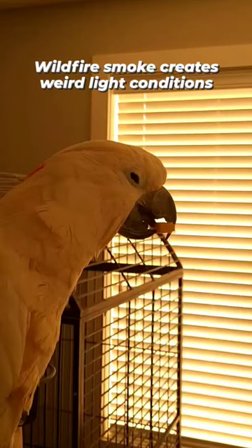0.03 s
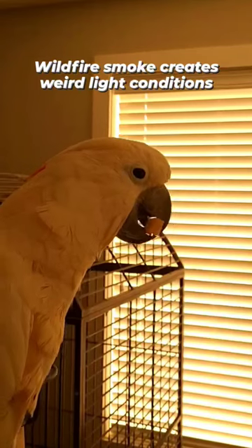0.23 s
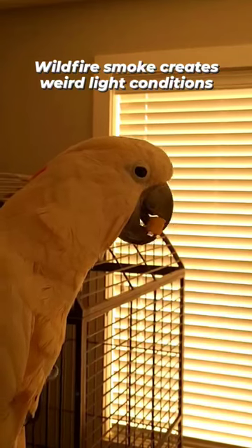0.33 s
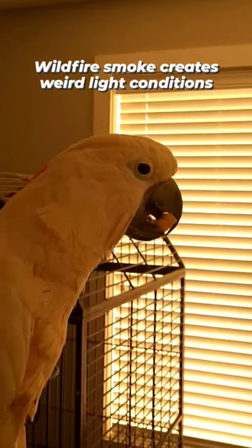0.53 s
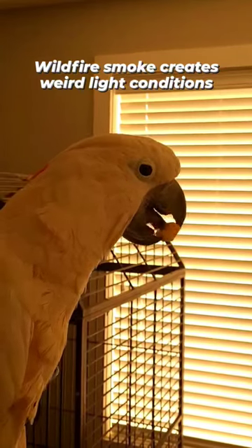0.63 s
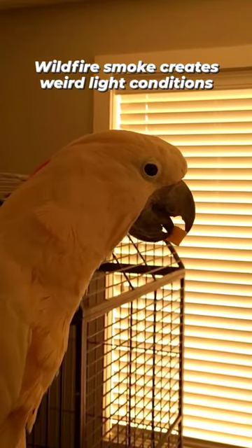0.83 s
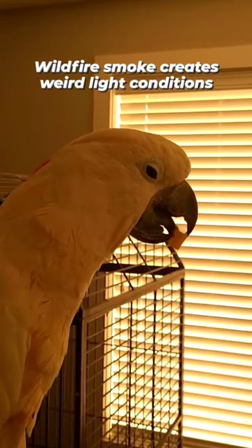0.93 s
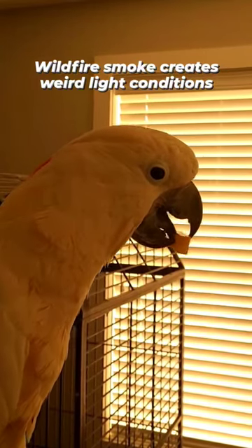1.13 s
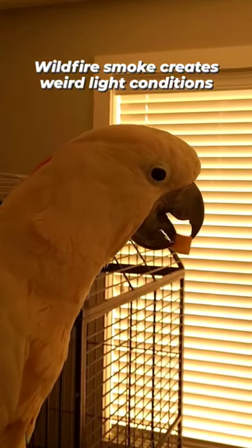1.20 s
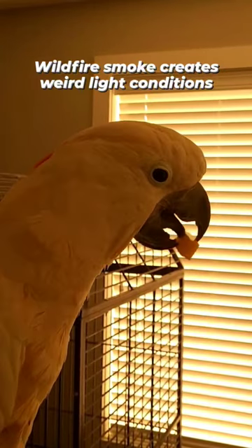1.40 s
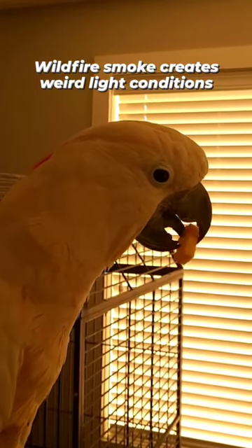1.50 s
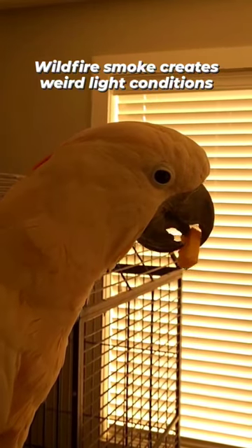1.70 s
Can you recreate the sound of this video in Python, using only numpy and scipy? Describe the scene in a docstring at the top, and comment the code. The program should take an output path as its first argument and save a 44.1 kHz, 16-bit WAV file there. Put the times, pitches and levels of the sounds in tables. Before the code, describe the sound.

A parrot nibbles hard food close to the microphone, its beak making sharp, irregular clicks and small cracks with a brief scrape early on. The quiet, bare room echoes lightly, and an appliance hums faintly behind.

```python
"""In a quiet, bare room, a parrot close by bites at a piece of hard food.
Each bite is a burst of tiny breaks that makes the beak ring; now and then the beak slips and scrapes.
The bird and its cage scatter these sounds, and the walls echo them.
Behind it all, an appliance hums unevenly over faint room noise."""
import sys
import numpy as np
from scipy import signal
from scipy.fft import rfft, irfft
from scipy.io import wavfile
from scipy.ndimage import uniform_filter1d

SR = 44100
rng = np.random.default_rng(int(sys.argv[2]) if len(sys.argv) > 2 else 0)


def generate_wav(sig):
    """Save sig (samples, or channels by samples) to the path in sys.argv[1] as 16-bit PCM at SR."""
    pcm = np.round(np.clip(np.atleast_2d(sig).T, -1, 1) * 32767).astype(np.int16)
    wavfile.write(sys.argv[1], SR, pcm)


N = 77175

# Tone of the broad room noise: f/Hz, relative level/dB
NOISE_SHAPE = [(25, -11), (60, 1.5), (160, 4), (300, 3), (450, 1), (650, -9), (1000, -4), (1450, -7.5),
               (2200, -18), (3000, -37), (4000, -22.5), (6000, -32.5), (15000, -29)]
# Low drones in the room noise: f/Hz, width/Hz, level/dB
LOW_DRONES = [(71.4, 10, -74.5), (92.6, 7.7, -81), (223.7, 16, -68.5), (301.7, 17, -76), (420, 45, -72.5)]
# How the hum swells and fades, before HUM_BOOST_DB is added: t/s, level/dB
HUM_SWELLS = [(0.56, -67.5), (0.612, -63.5), (0.646, -69), (0.742, -75), (0.764, -80.5), (0.888, -61),
              (0.986, -81), (1.026, -59.5), (1.056, -85), (1.126, -59), (1.166, -82.5), (1.208, -55),
              (1.266, -54), (1.292, -77.5), (1.372, -54.5), (1.408, -66.5), (1.632, -57.5), (1.75, -67.5)]
# One bite a row: t/s, level/dB, ring f/Hz; then, compared with the ring: head/dB, thud/dB, knock/dB,
# tick/dB, glint/dB, crack/dB; last: extra crack treble/dB, crumble time/ms, echo level/dB
BEAK_BITES = [ (0.1148, -32.5, 3240, -16, -10, 6, -10, -12, -1.5, -6, 4.3, 2),
              (0.1494, -8, 3704, 8, 1.5, -0.5, 5.5, -22, -15, -15, 3.6, -6),
              (0.1521, 5, 4060, -1, -10.5, -29, -9, -27.5, -5.5, -4, 0.95, 2.5),
              (.2580, -16, 4153, -8.5, -4.5, -4, -6.5, -10.5, -1, -11, 1, -1.5),
              (0.2595, 10, 4280, -7.5, -9.5, -5, -10.5, -1, 0, 1.5, 0.56, 5),
              (0.4357, 0.5, 3704, -0.5, 3, -16, -3.5, -8, 0.5, -1, 0.39, 0),
              (0.5049, -11.5, 3570, 8, -5, 1.5, -24.5, -14, -12, -23, 0.7, -0.5),
              (0.5083, -20, 4200, 2, 2, -3, 3, 5, 11, -1, 2.4, -1),
              (0.7265, -17.5, 4400, -9.5, -16.5, -7.5, -6, -15, -7.5, 8, .7, 2),
              (0.7304, -13.5, 4290, -21, -4.5, -3.5, -4, -4, -25, -6, 1.9, -3),
              (.9305, -36.5, 3900, -5, 1, -2, -4, -12, -19, -1, 0.77, 4),
              (0.9552, -29.5, 3800, -21, 3, -11, -15, -26, -9, -20, 0.36, 0),
              (1.0867, -34.5, 3900, 0, 6, 7, -5, -16, -14, 7, .8, 8),
              (1.1031, -15.5, 4020, -1, -12.5, -34, -12.5, -22, -10.5, 1.5, 1.4, 5.5),
              (1.1081, -5, 3750, -11.5, -20, -1, -17, -20, -20, 0, 0.7, -8),
              (1.3294, -19, 3760, 5, -11.5, 7, -2, -2, -2.5, 0, 0.85, 4.5),
              (1.4153, -27.5, 4090, 12, 11, -6, -22, -13.5, -3, -4, 0.24, 2.5),
              (1.5140, -27, 4120, 8, -4, 4, -12, -22, -26, -9.5, 1.2, -1),
              (1.547, -29.5, 4070, 8, 12, 14, -9, -20, -3.5, -12, 0.443, -3),
              (1.5636, -19.5, 4370, -22, -1, -1, -16, -16, 6, -13, 0.94, 10.5),
              (1.5656, 0, 4350, -6.5, -15, -6.5, -10.5, -9.5, -10.5, -4.5, 0.44, -4),
              (1.6445, -7.5, 3630, 10, -11, -3, -28, -5, -0.5, -2, 1, 0.5),
              (1.6456, -7, 3830, 11.5, -19, 1.5, -3, -21, -4, -4, 1.5, -3.5), ]
# Tone of the food cracking: f/Hz, relative level/dB
CRACK_SHAPE = [(200, -5.5), (400, -17.5), (1000, -5.5), (2200, -4.5), (3200, -6.5), (5300, -7.5),
               (6300, -8.5), (7100, -5), (9000, -13), (11000, -8), (15000, -16.5)]
# The late echo, band by band: f/Hz, time to fade by 60 dB/s, level/dB (also sets the early echoes)
ECHO_BANDS = [(150, .7, 0.5), (350, 1, 1), (860, 0.64, -2.5), (1730, 0.63, 0.5), (3900, 0.55, -0.5),
              (7362, 0.49, -2.5), (12400, 0.27, -2.5), (16000, .45, -6)]
# The beak slipping on the food: t/s, length/s, level/dB, f/Hz
BEAK_SCRAPES = [(0.4382, 0.015, 0, 3550), (0.454, 0.003, -11, 3780), (0.457, 0.0073, -4.5, 3970),
                (0.486, 0.024, -19.5, 3974)]
# Pitches at which the head and the beak (the other four) ring: f/Hz, width/Hz
HEAD, THUD, KNOCK, TICK, GLINT = (366, 190), (846, 340), (1455, 307), (7680, 1000), (12380, 920)

HUM_BOOST_DB = 4


def undb(db):
    """Turn decibels into a number to multiply by."""
    return 10 ** (np.asarray(db) / 20)


def unit(x):
    """Scale to an energy of 1."""
    return x / np.sqrt(np.sum(x ** 2, axis=-1, keepdims=True))


def on_log(f, hz, values):
    """Join points with straight lines, giving every octave the same space."""
    return np.interp(np.log(f + 1), np.log(hz), values)


def peak(f, hz, width):
    """How strongly something rings at each frequency: 1 at hz, falling steeply to both sides."""
    return 1 / (1 + ((f ** 2 - hz ** 2) / (f * width)) ** 2)


def colour(x, points, size=512):
    """Shape a sound's tone to follow points of f/Hz, level/dB."""
    log_gain = np.log(undb(on_log(np.fft.rfftfreq(size, 1 / SR), *np.array(points).T)))
    cepstrum = irfft(log_gain)
    cepstrum[1:size // 2] *= 2  # folded so that ringing comes after a hit, never before
    cepstrum[size // 2 + 1:] = 0
    return signal.fftconvolve(x, irfft(np.exp(rfft(cepstrum))))[:len(x)]


def pan(left_db):
    """Left and right gains that make the left side left_db louder."""
    return undb(np.array([[left_db], [-left_db]]) / 2)


def add(track, start, sound):
    """Mix a sound into a track at its start time."""
    i = int(start * SR)
    track[:, i:i + sound.shape[-1]] += sound


def wide_noise(alike_below_hz=480):
    """Stereo hiss, alike on both sides in the bass and unrelated in the treble."""
    mid, side = rfft(rng.standard_normal((2, N)))
    alike = .93 / (1 + (np.fft.rfftfreq(N, 1 / SR) / alike_below_hz) ** 2)
    shared = mid * np.sqrt(1 + alike)
    opposite = np.array([[1], [-1]]) * side * np.sqrt(1 - alike)
    return irfft(shared + opposite, N) / np.sqrt(2)


def room_noise(hiss_db=-65):
    """Faint, broad noise with a few low drones in it."""
    f = np.fft.rfftfreq(N, 1 / SR)
    shape = undb(on_log(f, *np.array(NOISE_SHAPE).T))
    out = undb(hiss_db) * unit(irfft(rfft(wide_noise()) * shape, N))
    noise = rfft(wide_noise())
    for hz, width, db in LOW_DRONES:
        drone = irfft(noise / (1 + ((f - hz) / width * 2) ** 2), N)
        out += undb(db) * unit(drone)
    return out * np.sqrt(N)


def appliance_hum(hz=255.2, wander_hz=3.5, left_lead_rad=.6):
    """An appliance gives a low tone that wavers in loudness and a little in pitch."""
    t = np.arange(N) / SR
    drift = uniform_filter1d(rng.standard_normal(N), N // 20) * np.sqrt(N // 20)
    phase = 2 * np.pi * np.cumsum(hz + wander_hz * drift) / SR
    tone = np.sqrt(2) * np.sin([phase + left_lead_rad, phase])
    level_db = HUM_BOOST_DB + np.interp(t, *np.array(HUM_SWELLS).T)
    return tone * undb(level_db) * pan(left_db=-2.5)


def food_breaking(crumble_ms, snaps_per_s=5000, crumble_share=0.57, even_over_hz=240.74, size=2048):
    """One snap, then a fading spray of smaller ones, evened out so that no pitch stands out."""
    t, f = np.arange(size) / SR, np.fft.rfftfreq(size, 1 / SR)
    spray = rng.standard_normal(size) * (rng.random(size) < snaps_per_s / SR) + 1e-9
    spray[:2] = 0
    force = np.sqrt(crumble_share) * unit(spray * np.exp(-t * 1e3 / crumble_ms))
    force[0] += np.sqrt(1 - crumble_share)  # the first snap
    power = uniform_filter1d(np.abs(rfft(force)) ** 2, int(even_over_hz / f[1]))
    return unit(colour(force, np.c_[f + 1, -10 * np.log10(power + 1e-9)]))


def bite(ring_hz, head_db, thud_db, knock_db, tick_db, glint_db, crack_db, treble_db, crumble_ms):
    """The food breaks with a broad crack and sets the beak and head ringing."""
    size = 1024
    f = np.fft.rfftfreq(size, 1 / SR) + 1
    ring_width_hz = 1460 * 2 ** (crack_db / 21.5)  # a gentle nibble rings more purely
    rings = [(HEAD, head_db), (THUD, thud_db), (KNOCK, knock_db),
             ((ring_hz, ring_width_hz), 0), (TICK, tick_db), (GLINT, glint_db)]
    ring_power = sum((undb(db) * peak(f, hz, width)) ** 2 for (hz, width), db in rings)
    crack = undb(crack_db + on_log(f, *np.array(CRACK_SHAPE).T) + treble_db * (f > 9300))
    tone_db = 10 * np.log10(crack ** 2 + ring_power)
    return colour(food_breaking(crumble_ms), np.c_[f, tone_db], size=size)


def cage_scatter(scatter_db=0.5, fade_s=0.004):
    """A click arrives directly, followed by quick bounces off the bird and the bars."""
    t = np.arange(N // 100) / SR
    response = undb(scatter_db) * unit(wide_noise()[:, :len(t)] * np.exp(-t / fade_s))
    response[[0, 1], [0, 2]] += pan(left_db=4.5)[:, 0]  # the direct sound, 2 samples later on the right
    return response


def wall_echo(gap_s=.007, early_db=-4, early_fade_s=0.026, late_db=-2):
    """The walls return a click as many early echoes, then a tail that dies sooner in the treble."""
    t, f = np.arange(N) / SR, np.fft.rfftfreq(N, 1 / SR)
    age, arrived = np.maximum(t - gap_s, 0), t > gap_s
    noise, centres, out = rfft(wide_noise()), np.array(ECHO_BANDS)[:, 0], 0
    early = undb(early_db) * unit(arrived * np.exp(-age / early_fade_s))
    for weights, (_, fade_s, db) in zip(np.eye(len(ECHO_BANDS)), ECHO_BANDS):
        band = irfft(noise * on_log(f, centres, weights), N)
        late = undb(late_db) * unit(arrived * np.exp(-np.log(1000) * age / fade_s))
        out = out + undb(db) * band * np.hypot(early, late)
    return out * pan(left_db=1.8)


def scrape(length_s, hz, width_hz=820, slips_per_s=2600, hiss_db=-24.5, size=2048):
    """A short swell of tiny slips keeps the beak ringing."""
    f = np.fft.rfftfreq(size, 1 / SR) + 1
    swell = np.sin(np.pi * np.clip(np.arange(size) / SR / length_s, 0, 1))
    slips = rng.standard_normal(size) * (rng.random(size) < slips_per_s / SR) + 1e-9
    tone_db = 20 * np.log10(peak(f, hz, width_hz) + undb(hiss_db))
    return colour(unit(slips * swell), np.c_[f, tone_db])


def parrot(low_cut_hz=285):
    """All the bites and scrapes with their echo; the head moves, so each one scatters differently."""
    near, to_walls = np.zeros((2, 2 * N)), np.zeros((1, 2 * N))
    sounds = [(start, undb(db) * bite(*tone), echo_db) for start, db, *tone, echo_db in BEAK_BITES]
    sounds += [(start, undb(db) * scrape(length, hz), 0) for start, length, db, hz in BEAK_SCRAPES]
    for start, sound, echo_db in sounds:
        add(near, start, signal.fftconvolve(sound[None], cage_scatter()))
        add(to_walls, start, undb(echo_db) * sound)
    heard = near[:, :N] + signal.fftconvolve(to_walls[:, :N], wall_echo())[:, :N]
    return signal.sosfilt(signal.butter(4, low_cut_hz, "high", fs=SR, output="sos"), heard)


def scene():
    """The parrot eats in front of the hum and the room noise."""
    return parrot() + appliance_hum() + room_noise()


def record(dry):
    """The sound comes in quickly after a moment of silence, with its highest treble cut away."""
    silence_s, fade_in_s, top_hz = 0.11, 0.0046, 15350
    fade_in = np.clip((np.arange(N) / SR - silence_s) / fade_in_s, 0, 1)
    return signal.sosfilt(signal.ellip(8, .2, 70, top_hz, fs=SR, output="sos"), dry * fade_in)


dry = scene()
out = record(dry)
generate_wav(out)
```